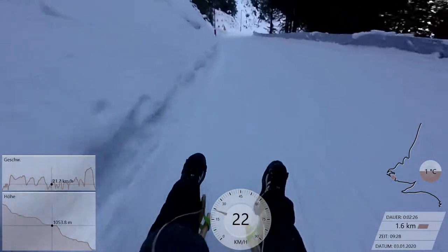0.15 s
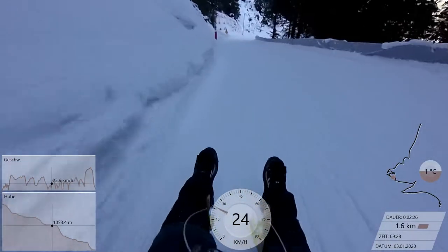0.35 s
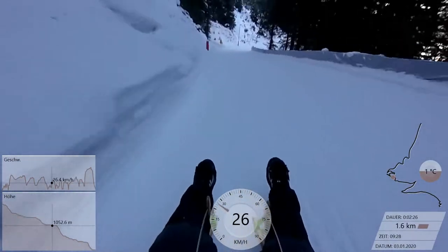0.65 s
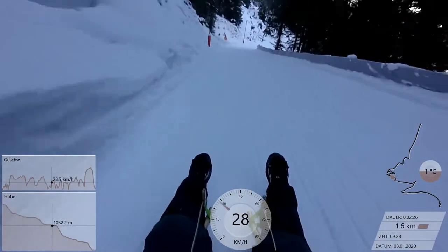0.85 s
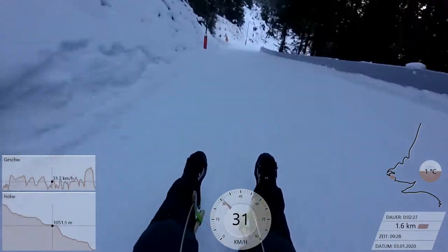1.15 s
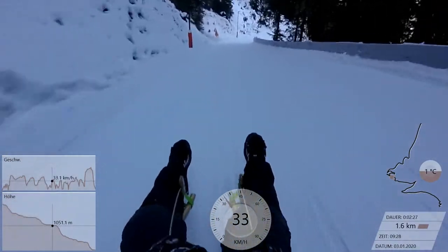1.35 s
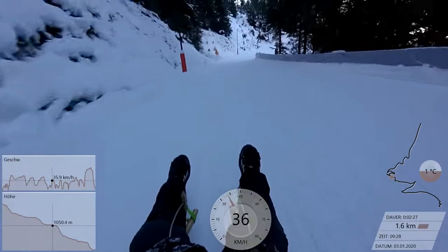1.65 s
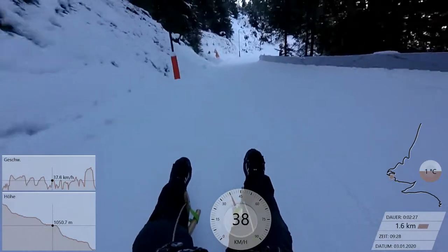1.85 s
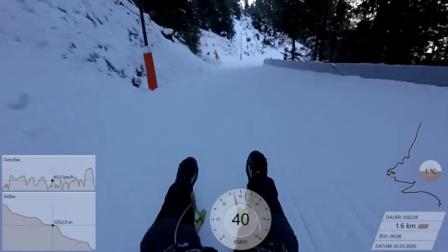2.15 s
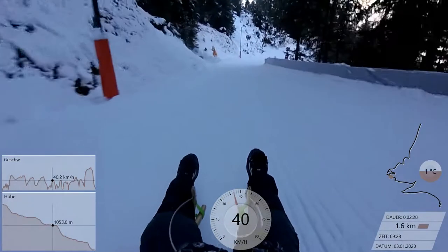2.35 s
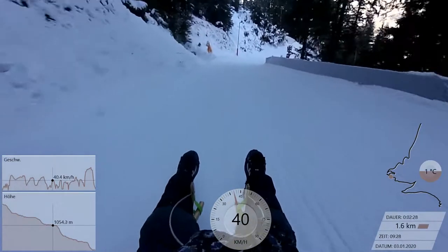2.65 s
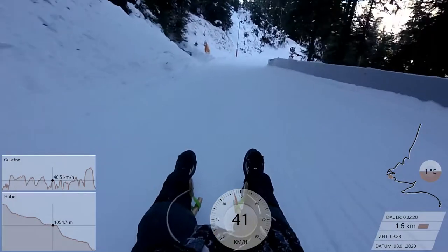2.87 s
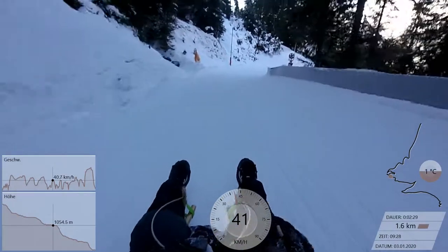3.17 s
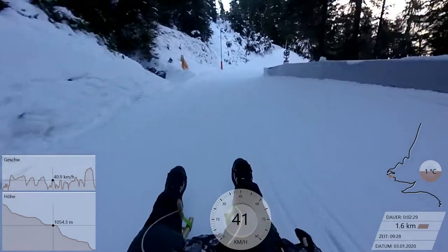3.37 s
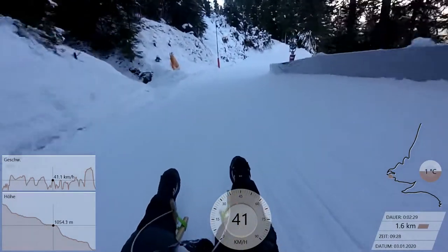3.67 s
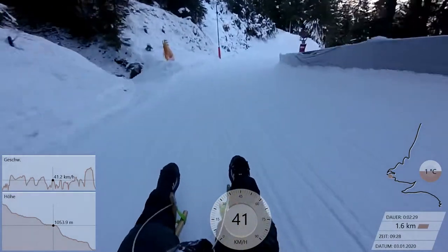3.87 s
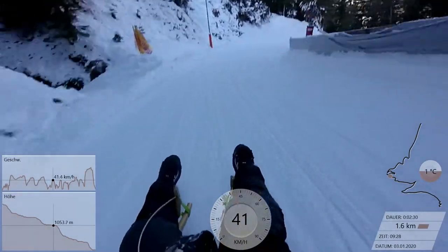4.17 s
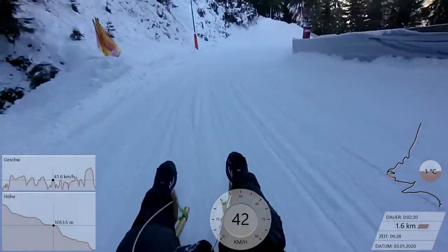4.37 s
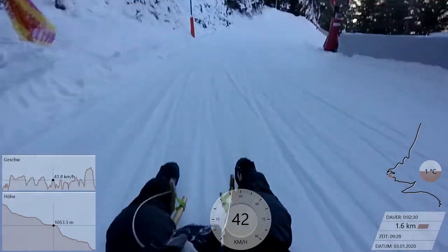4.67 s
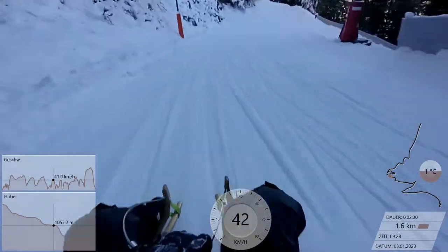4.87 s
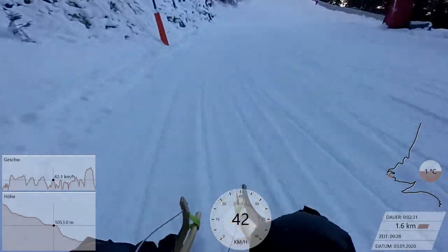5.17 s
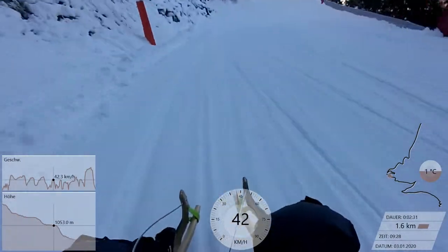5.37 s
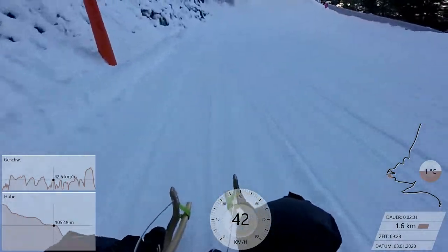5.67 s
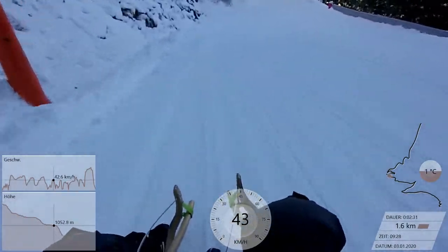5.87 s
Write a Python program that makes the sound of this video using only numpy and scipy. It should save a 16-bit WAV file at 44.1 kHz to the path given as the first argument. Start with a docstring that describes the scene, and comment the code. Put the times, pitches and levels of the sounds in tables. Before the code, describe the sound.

A wooden sledge rides down packed snow, heard dry and close through a housed microphone on the rider. Throughout, a dense low-mid rumble of the frame and a grainy grind flutter irregularly, under lumpy low wind and a faint crystal hiss. It starts moderate, dips at 0.3 s, then roughens with short scraping skids until 0.9 s and soft rut thumps. Knocks return around 1.4 s; a skid at 1.7 s leads to the heaviest cluster of low thumps at 1.9-2.1 s. Grinding is strong near 2.3 s, easing toward 3.5 s with bumpy drumming. A longer scrape comes at 3.6 s, then a full steady grind. Sharp skids bite at 4.65-4.9 s, the roughest moment. Then the scrape thins and spray brightens; dull clod crunches fall at 5.1-5.4 s, with tiny ice ticks. One brief scrape at 5.6 s, then it quietens to 6 s.

```python
"""A packed snow track: a wooden sledge runs down it, heard by a microphone in a housing on the rider.
Grains of impact noise drum on the frame, grind under the runners, scrape at their edges and hiss as spray.
Decaying sines thump at the ruts; noise bursts crunch as clods break and tick as ice crumbs strike.
The sledge gathers speed, skids and crosses bumps; late on, the rider leans back: more spray, less scrape.
Low, lumpy noise is the wind on the microphone; the housing notches the treble."""
import sys
import numpy as np
from scipy import signal
from scipy.fft import rfft, irfft, next_fast_len
from scipy.io import wavfile
from scipy.ndimage import map_coordinates

SR = 44100
rng = np.random.default_rng(int(sys.argv[2]) if len(sys.argv) > 2 else 0)


def to_wav(sig):
    """Store sig (one row per channel, or 1-D mono) as 16-bit WAV at the path in sys.argv[1].

    Samples outside -1..1 are clipped; the rate is SR.
    """
    pcm = np.clip(np.atleast_2d(sig), -1, 1) * 32767
    pcm = np.round(pcm).astype(np.int16)
    wavfile.write(sys.argv[1], SR, pcm.T)  # frames by channels


N = 265526


def amp(db):
    """Decibels to gain."""
    return 10 ** (np.asarray(db) / 20)


def unit(x):
    """x at rms 1."""
    return x / np.sqrt(np.mean(x ** 2) + 1e-20)


def curves(rows):
    """Breakpoint rows to one value per sample, for each column after the time."""
    time_s, *columns = np.transpose(rows)
    return [np.interp(np.arange(N) / SR, time_s, column) for column in columns]


def ramp(start_s, length_s):
    """Rises from 0 to 1 over length_s and stays there."""
    return np.clip((np.arange(N) / SR - start_s) / length_s, 0, 1)


def stretches(rows, attack_s, release_s):
    """Each stretch sets in, holds and lets go; one summed dB curve for each strength column."""
    total_db = 0
    for start_s, length_s, *strengths_db in rows:
        shape = ramp(start_s, attack_s) - ramp(start_s + length_s, release_s)
        total_db = total_db + np.outer(strengths_db, shape)
    return total_db


def wobble(knots_per_s):
    """A smooth random curve at rms 1: a spline through random knots."""
    knots = rng.standard_normal(int(N * knots_per_s / SR) + 4)
    return unit(map_coordinates(knots, [np.arange(N) * knots_per_s / SR]))


def filtered(x, response):
    """x times a response of frequency [Hz]."""
    size = next_fast_len(N + SR // 2)
    spectrum = rfft(x, size) * response(np.fft.rfftfreq(size, 1 / SR))
    return irfft(spectrum, size)[:N]


def coloured(x, spectrum):
    """x shaped by (Hz, dB) points on a log frequency axis, at rms 1."""
    point_hz, point_db = np.transpose(spectrum)

    def response(hz):
        return amp(np.interp(np.log(hz + 1), np.log(point_hz), point_db, right=-120))
    return unit(filtered(x, response))


def resonate(x, modes):
    """x through parallel damped resonances of alternating sign."""
    def response(hz):
        total = 0
        for k, (centre_hz, width_hz, db) in enumerate(modes):
            damping = 1j * hz * width_hz
            total = total + (-1) ** k * amp(db) * damping / (centre_hz ** 2 - hz ** 2 + damping)
        return total
    return filtered(x, response)


def damped(x, corner_hz, order):
    """Soft snow passes little above the corner."""
    return filtered(x, lambda hz: 1 / np.sqrt(1 + (hz / corner_hz) ** (2 * order)))


def grains(rate_per_s, spread_db):
    """Tiny impacts at random moments, of random sign and uneven size, at rms 1."""
    struck = rng.random(N) < rate_per_s / SR
    sign = np.sign(rng.standard_normal(N))
    return unit(struck * sign * amp(spread_db * rng.standard_normal(N)))


def rumble(level_db, load):
    """Small lumps of the track drum on the runners and ring the frame."""
    # broad resonances of frame and seat: (centre [Hz], width [Hz], relative gain [dB])
    frame_modes = [(155, 78, -1.34), (257.5, 110, 0.5), (377, 175, -3.5)]
    blows = grains(rate_per_s=2600, spread_db=1.5) * amp(0.2 * load)
    drumming = resonate(blows, frame_modes)
    return amp(level_db) * unit(damped(drumming, corner_hz=550, order=4))


def runners(grind_db, scrape_db, load, catch_db=-0.18):
    """Packed snow crushes under the runners; their edges shave it and catch unevenly."""
    # snow crushed under the runners: (frequency [Hz], relative level [dB])
    grind_spectrum = [(150, -22.5), (330, -1.5), (480, 2.1), (800, -1.6), (1020, -10), (1300, -21),
                      (1700, -28), (2400, -51), (5000, -91)]
    # snow shaved by the edges: (frequency [Hz], relative level [dB])
    scrape_spectrum = [(500, -13), (950, 8), (1300, 3), (1700, -6), (2100, -11.5), (3000, -20), (4200, -27),
                       (6000, -38), (12000, -67.5)]
    grind = coloured(grains(rate_per_s=4000, spread_db=3.0) * amp(0.75 * load), grind_spectrum)
    scrape = coloured(grains(rate_per_s=5000, spread_db=4.0) * amp(0.53 * load), scrape_spectrum)
    uneven_scrape_db = scrape_db + catch_db * wobble(22)
    return amp(grind_db) * grind + amp(uneven_scrape_db) * scrape


def spray(level_db, fizz_db, load, grit_db=-9.5, clump_db=4.5):
    """Loose crystals fly off in a grainy hiss, with clumps of coarse grit and a finer fizz on top."""
    # flying crystals and grit: (frequency [Hz], relative level [dB])
    spray_spectrum = [(1500, -3), (2500, 4.5), (4200, 0.5), (5800, -2), (7000, -5.5), (8500, -10),
                      (10300, -16), (11500, -24), (14000, -33.5)]
    # finest crystals: (frequency [Hz], relative level [dB])
    fizz_spectrum = [(6000, -8.5), (9000, -4.5), (12200, 2.5), (13200, -4.5), (14500, -23.5)]
    crystals = coloured(grains(rate_per_s=11000, spread_db=4.0) * amp(0.61 * load), spray_spectrum)
    fizz = coloured(grains(rate_per_s=3000, spread_db=3.0), fizz_spectrum)
    clumps = amp(clump_db * np.tanh(wobble(35)))
    grit = coloured(grains(rate_per_s=160, spread_db=1.0) * clumps, spray_spectrum)
    return amp(level_db) * (crystals + amp(fizz_db) * fizz + amp(grit_db) * grit)


def ruts(attack_s=0.0046, t60_s=0.032):
    """Each rut gives the sledge a soft blow: a fast-dying sine with a faint, inharmonic overtone."""
    # ruts that thump the frame: (time [s], peak level [dB], pitch [Hz])
    rut_rows = [(0.455, -14, 246), (0.474, -9.5, 266), (0.51, -12.5, 293), (0.592, -15, 274),
                (0.737, -11, 281), (0.793, -16, 295), (0.91, -16, 184), (1.045, -15.5, 257),
                (1.11, -11, 220), (1.404, -10.5, 266), (1.438, -10, 330), (1.463, -11.5, 300),
                (1.633, -12, 272), (1.892, -5.5, 208), (1.969, -7, 182), (1.985, -8, 200),
                (2.003, -4.5, 260), (2.049, -6.5, 350), (2.062, -10, 250), (2.083, -12.5, 230),
                (2.352, -9, 170), (2.378, -13.5, 240), (2.666, -15.5, 300), (3.028, -14.5, 270),
                (3.231, -16, 210), (3.292, -9.5, 184), (3.44, -14, 200), (4.345, -15, 240),
                (4.902, -16, 300), (5.086, -18, 216)]
    out, t = np.zeros(N + SR), np.arange(SR // 4) / SR
    for start_s, peak_db, hz in rut_rows:
        overtone_hz = hz * rng.uniform(2.1, 2.2)
        ring = np.sin(2 * np.pi * hz * t) + 0.15 * np.sin(2 * np.pi * overtone_hz * t)
        thump = ring * (1 - np.exp(-t / attack_s)) ** 2 * amp(-60 * t / t60_s)
        out[round(start_s * SR):][:len(t)] += amp(peak_db) * thump / np.abs(thump).max()
    return out[:N]


def clods(attack_s=0.00053, t60_s=0.039, width_hz=750):
    """Each frozen clod breaks under a runner in a short, dull crunch of resonant noise."""
    # clods: (time [s], peak level [dB], centre [Hz])
    clod_rows = [(5.14, -17, 780), (5.276, -19, 605), (5.412, -20, 720)]
    out, t = np.zeros(N), np.arange(N) / SR
    for start_s, peak_db, hz in clod_rows:
        age_s = np.maximum(t - start_s, 0)
        decay = amp(-60 * np.minimum(age_s / t60_s, 2))
        burst = rng.standard_normal(N) * (1 - np.exp(-age_s / attack_s)) * decay
        body = [(hz, width_hz, 0)]
        crunch = resonate(resonate(burst, body), body)
        crunch = damped(crunch, corner_hz=1500, order=4)
        out += amp(peak_db) * crunch / np.abs(crunch).max()
    return out


def crumbs(t60_s=0.0029, shatter_t60_s=0.04, shatter_db=-19):
    """Bits of ice strike the sledge with a bright tick and shatter into a longer, weaker noise tail."""
    # ice crumbs: (time [s], peak level [dB], low-pass cutoff [Hz])
    crumb_rows = [(0.5103, -38, 4050), (0.532, -46, 8000), (1.69, -42, 8000), (2.626, -39, 6500),
                  (2.803, -39, 4500), (4.78, -43, 9500), (4.8554, -41, 10500), (5.1038, -37.5, 13200),
                  (5.278, -46.5, 12600), (5.9242, -47, 11400)]
    out, t = np.zeros(N + SR), np.arange(SR // 20) / SR
    for start_s, peak_db, cutoff_hz in crumb_rows:
        decay = amp(-60 * t / t60_s) + amp(shatter_db - 60 * t / shatter_t60_s)
        tick = rng.standard_normal(len(t)) * decay
        tick = signal.sosfilt(signal.butter(6, cutoff_hz, fs=SR, output="sos"), tick)
        out[round(start_s * SR):][:len(t)] += amp(peak_db) * tick / np.abs(tick).max()
    return out[:N]


def wind(level_db, lumps_db=1.0):
    """Eddies push on the microphone in lumps of low noise."""
    # wind on the microphone: (frequency [Hz], relative level [dB])
    buffet_spectrum = [(12, -32), (25, -12.5), (45, -4.5), (75, -1), (115, 2), (200, -7.5), (500, -31.5),
                       (1500, -73.5)]
    buffet = coloured(rng.standard_normal(N), buffet_spectrum)
    return amp(level_db) * unit(amp(lumps_db * wobble(28)) * buffet)


def scene():
    """Track, speed, skids and posture set the levels; one chattering load shakes the main snow layers."""
    # how rough and loose the track is: (time [s], roughness [dB])
    roughness = [(0, -4), (0.3, -6), (0.45, 0.3), (1.65, 1.9), (2.1, -1), (2.85, 1.3), (3.52, -1.1),
                 (4.15, 1.5), (4.5, -4), (4.87, 3.5), (5.12, 1.7), (5.45, -4), (6.02, -4)]
    # how hard the runners bite into the snow: (time [s], grind level [dB])
    grip = [(0.05, -25), (0.16, -26.5), (0.26, -33.5), (0.5, -27), (1.08, -26.5), (1.17, -29.5),
            (1.42, -23.5), (1.7, -23.5), (2.15, -21.5), (2.27, -19.5), (2.65, -21.5), (3.03, -23),
            (3.52, -25), (3.7, -20), (4.2, -20), (4.47, -23), (4.85, -18.5), (5.35, -27), (5.55, -24.5),
            (5.66, -24.5), (5.8, -28.5), (6.02, -29)]
    # sledge speed: (time [s], speed [km/h])
    speed = [(0, 21), (2.1, 40), (6.02, 43)]
    # airstream on the microphone: (time [s], level [dB])
    airstream = [(0, -27.5), (0.3, -35), (0.55, -24.5), (1.0, -28.5), (1.8, -27), (2.3, -29.5), (2.9, -27),
                 (3.25, -30.5), (4.05, -28.5), (4.45, -28.5), (4.8, -25.5), (5.2, -26.5), (5.55, -30),
                 (6.02, -34)]
    # edges skid sideways to steer: (start [s], length [s], extra scrape [dB], extra spray [dB])
    skids = [(0.33, 0.125, 2.6, 0.8), (0.5, 0.035, 2.5, 1), (0.64, 0.055, 4, 2.5), (0.79, 0.041, 3, 1),
             (1.665, 0.13, 3.5, 2), (1.86, 0.06, 2.6, 2), (2.8, 0.08, 1.5, 0), (2.98, 0.05, 2, -2),
             (3.615, 0.15, 3.5, 1), (3.94, 0.28, 0.2, 0), (4.645, 0.097, 4.5, 2.2), (4.775, 0.03, 6, 2.8),
             (4.845, 0.052, 5.5, 3), (5.04, 0.08, 1, 1), (5.62, 0.12, 3, -0.5)]
    # bumps that drum the frame harder: (start [s], length [s], extra rumble [dB])
    bumps = [(0.44, 0.032, 1.5), (0.7, 0.2, 1.5), (1.39, 0.051, 1), (1.97, 0.11, 2), (2.32, 0.19, 1.8),
             (3.22, 0.34, 3), (4.27, 0.27, 2), (4.6, 0.23, 1), (5.86, 0.096, 4)]

    (rough_db,), (grind_db,), (speed_kmh,) = curves(roughness), curves(grip), curves(speed)
    wind_db, = curves(airstream)
    bite_db = grind_db + 22.5  # against the grind of a straight, even run
    lean = ramp(start_s=4.55, length_s=0.41)  # the rider leans back and uncovers the runners
    shave_db, throw_db = stretches(skids, attack_s=0.014, release_s=0.045)
    bump_db, = stretches(bumps, attack_s=0.032, release_s=0.049)
    load = unit(wobble(26.05) + 0.68 * wobble(130))  # ripples of the track and the finer crust on them

    # base level, then dB per dB of roughness or grip, and dB for leaning back
    rumble_db = -22 + 0.43 * rough_db + 0.28 * bite_db + bump_db
    scrape_db = -35.5 + 0.94 * rough_db + shave_db - 4 * lean
    speed_gain_db = 0.17 * (speed_kmh - 39)  # a faster sledge throws more snow
    spray_db = -58 + speed_gain_db + 0.65 * rough_db + throw_db + 3.5 * lean
    fizz_db = -28.5 + 6 * lean  # against the crystals

    sledge = rumble(rumble_db, load) + runners(grind_db, scrape_db, load) + ruts() + clods()
    loose_snow = spray(spray_db, fizz_db, load) + crumbs()
    return (sledge + loose_snow + wind(wind_db))[None]


def record(dry):
    """The housing dips one narrow treble band by a few dB; nothing passes above the band limit."""
    notch_hz, half_width_hz, depth_db = 4870, 320, 4.4
    top_hz = 15000

    def response(hz):
        notch = amp(-depth_db * np.exp(-((hz - notch_hz) / half_width_hz) ** 2))
        return notch * (hz < top_hz)
    return filtered(dry[0], response)[None]


dry = scene()
out = record(dry)
to_wav(out)
```